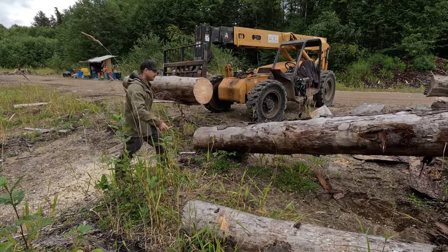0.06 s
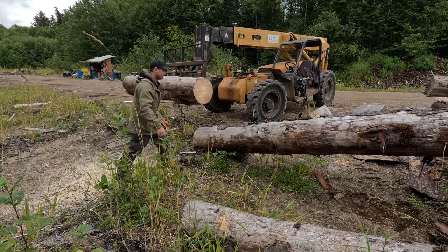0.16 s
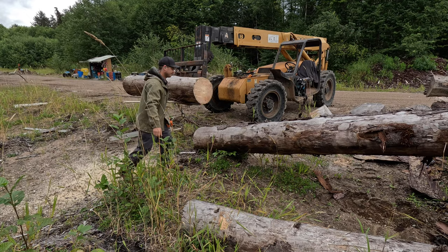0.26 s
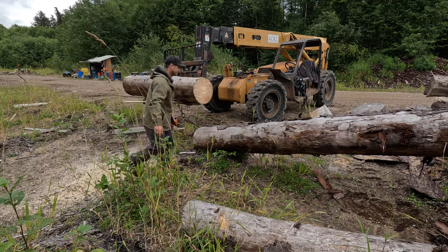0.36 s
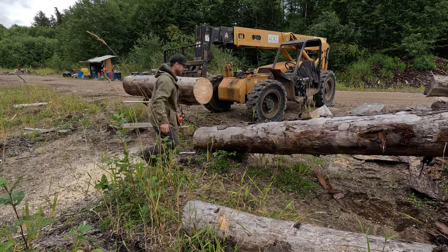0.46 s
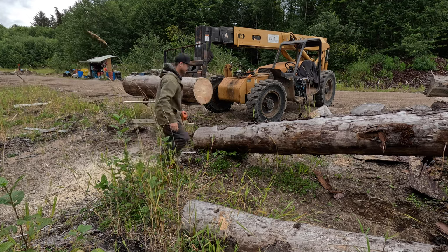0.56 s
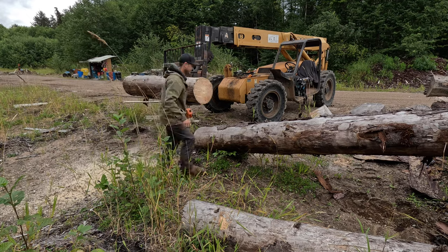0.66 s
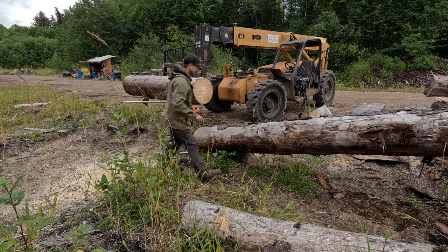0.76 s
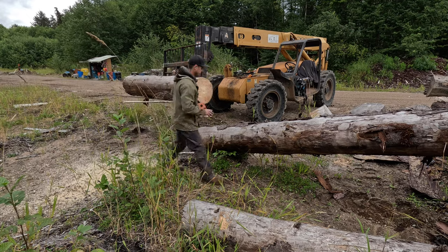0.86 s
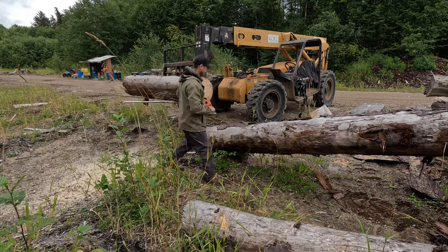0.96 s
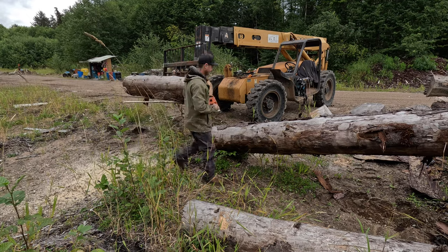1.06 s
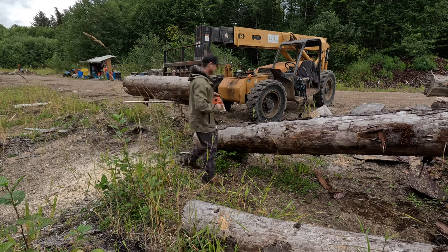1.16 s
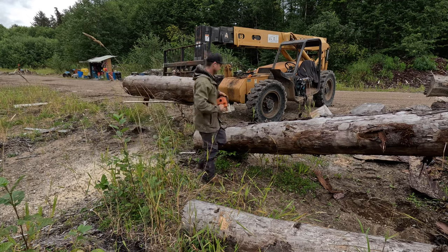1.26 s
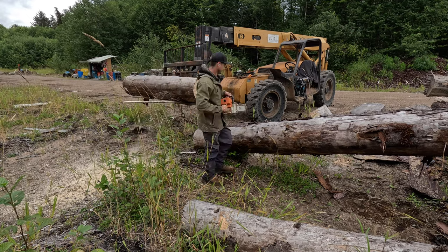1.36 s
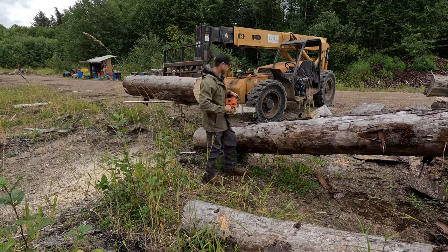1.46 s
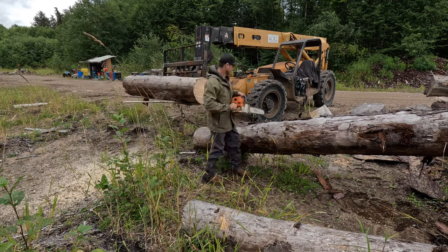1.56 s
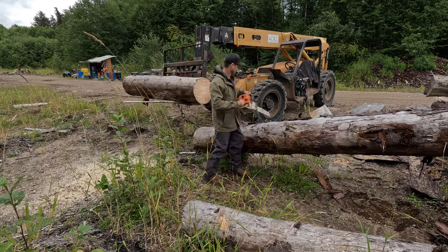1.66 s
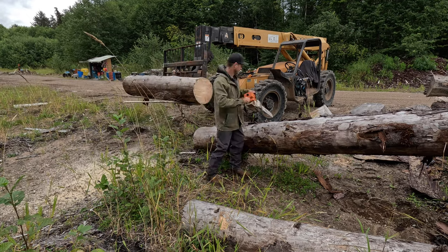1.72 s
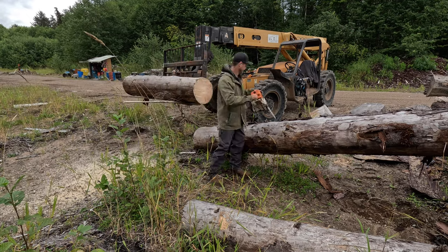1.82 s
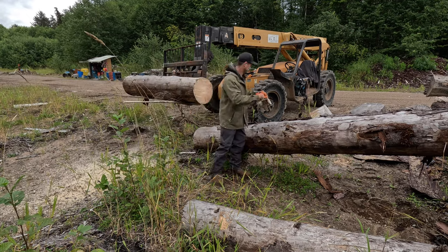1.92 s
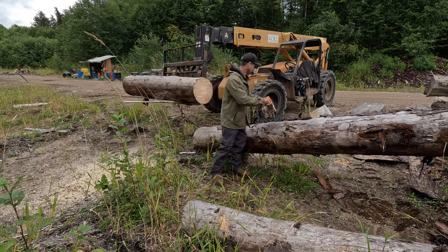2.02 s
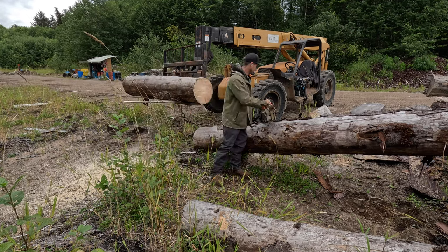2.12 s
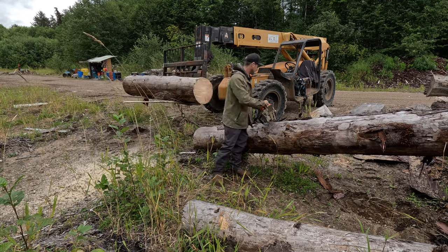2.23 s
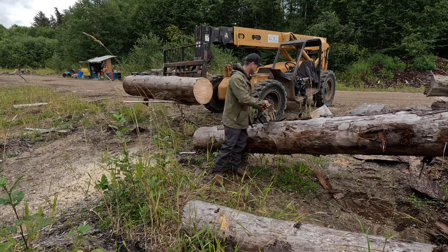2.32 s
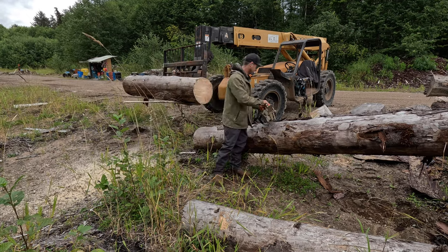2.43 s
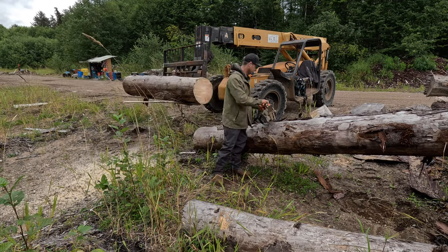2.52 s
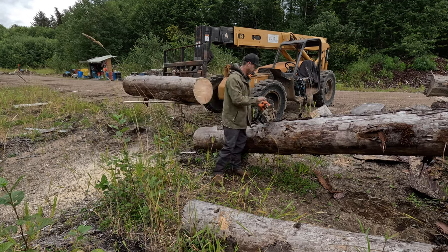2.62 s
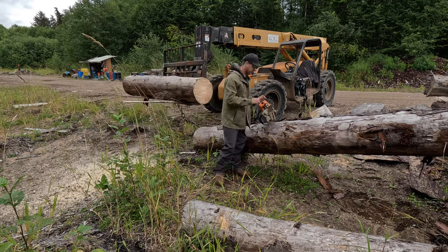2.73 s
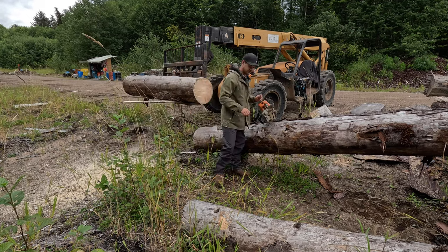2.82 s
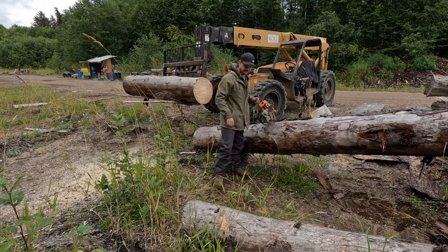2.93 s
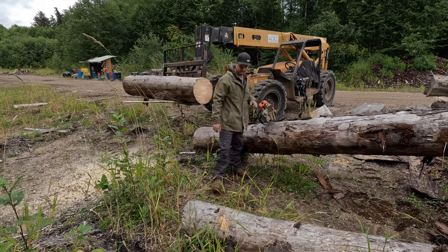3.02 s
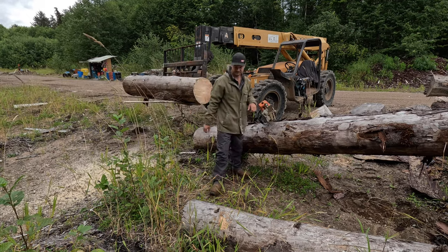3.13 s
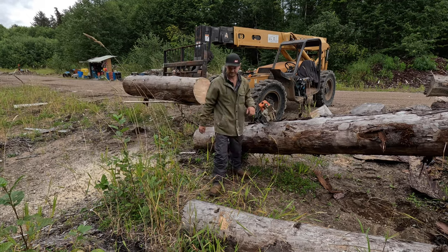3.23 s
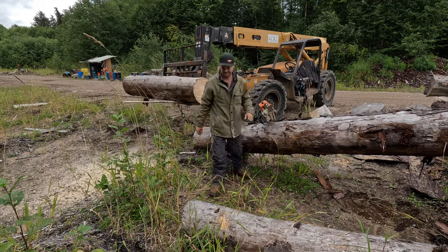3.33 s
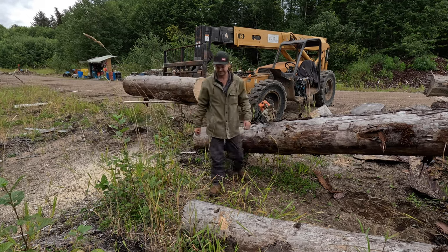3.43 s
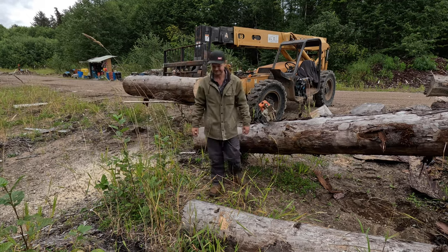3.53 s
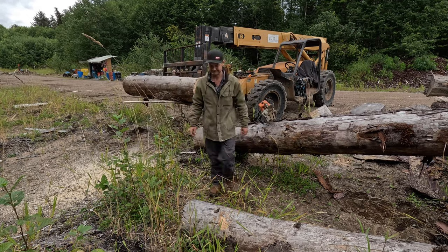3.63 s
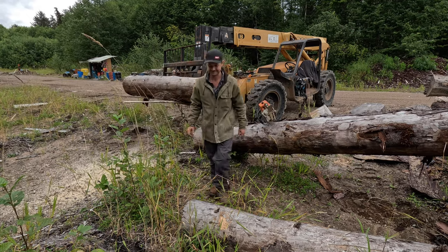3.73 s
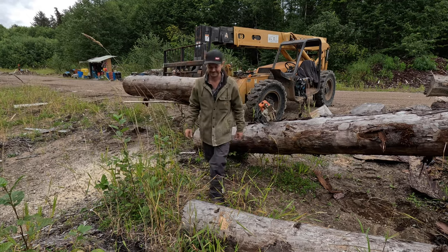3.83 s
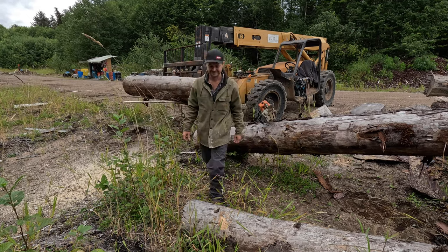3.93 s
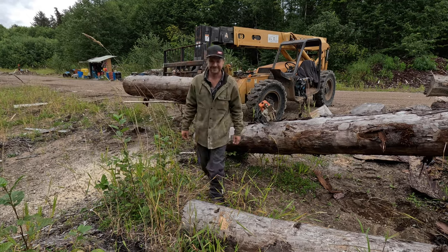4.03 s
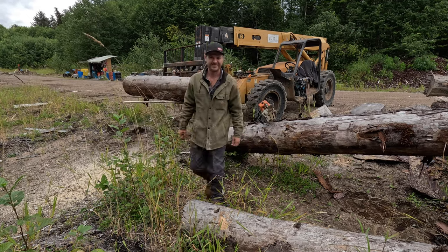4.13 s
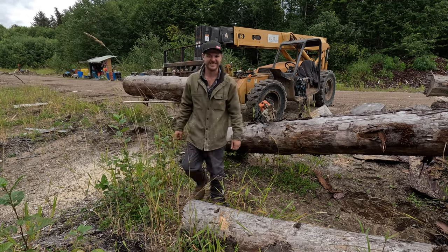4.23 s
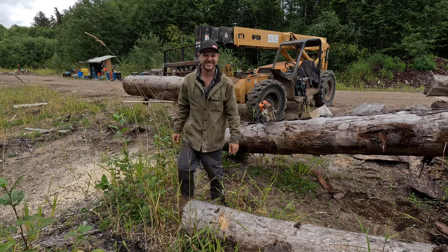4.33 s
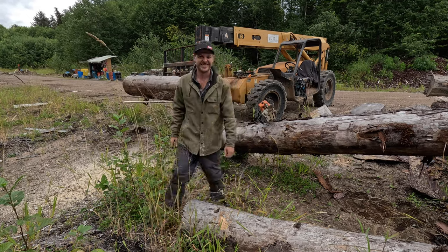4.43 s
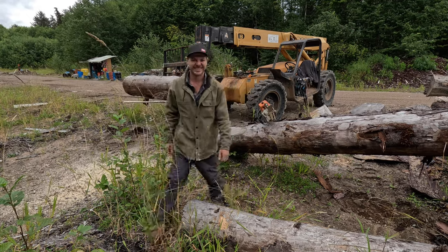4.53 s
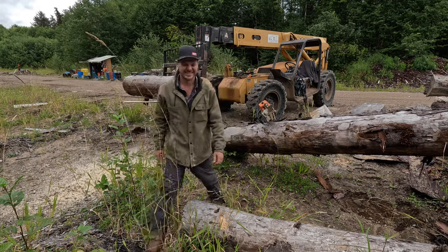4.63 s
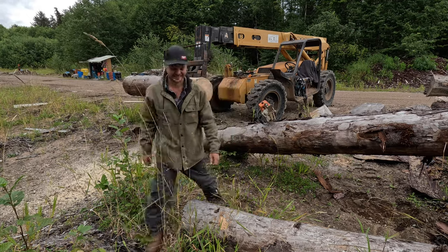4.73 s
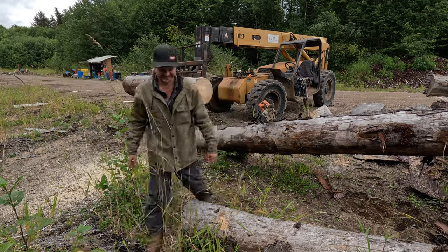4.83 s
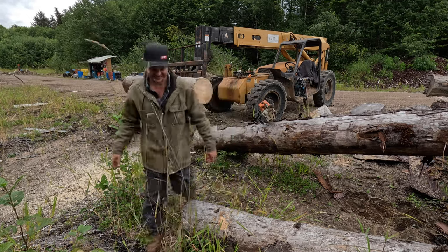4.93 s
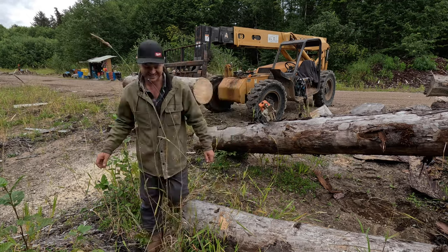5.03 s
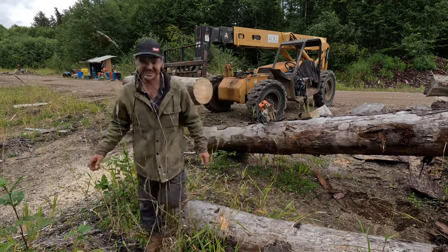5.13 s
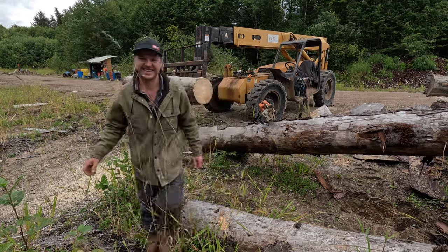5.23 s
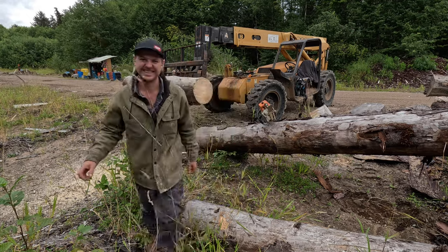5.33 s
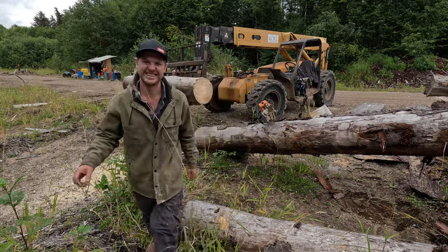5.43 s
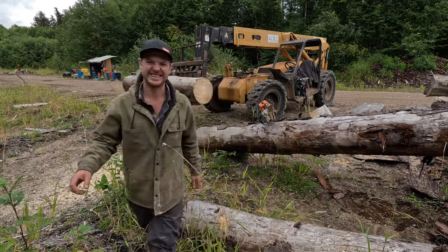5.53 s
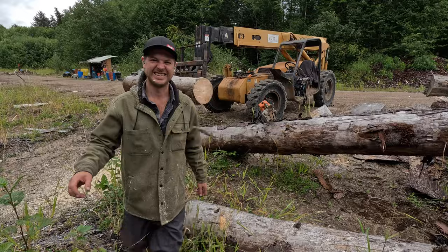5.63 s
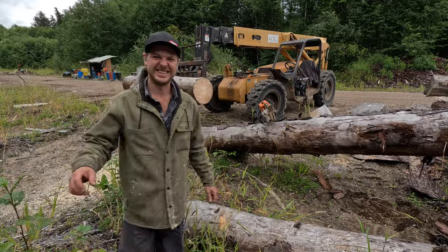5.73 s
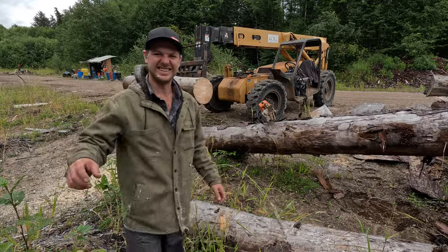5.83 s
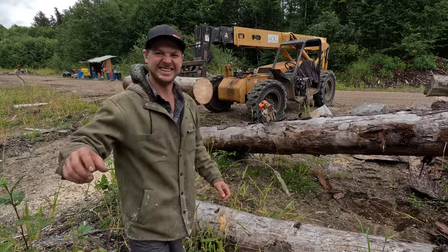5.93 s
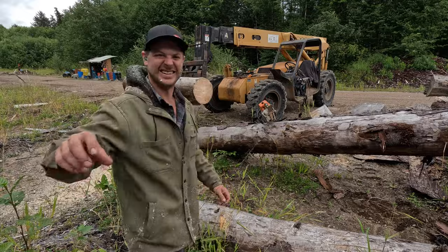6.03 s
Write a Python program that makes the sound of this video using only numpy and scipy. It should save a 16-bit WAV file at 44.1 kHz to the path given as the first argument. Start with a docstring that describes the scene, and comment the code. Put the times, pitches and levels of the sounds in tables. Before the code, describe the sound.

Footsteps swish and crunch through tall weeds, snapping twigs; a chainsaw clatters down onto a log, then the steps come closer.

```python
"""A log yard overgrown with tall weeds. Someone wades through, sets a chainsaw down on a log, stands a
moment and walks on. Leaves swish against the legs, stalks and bark litter crunch in many tiny slips,
twigs snap and boots thud on the earth. The saw rattles as it lands, the trunk rings hollow and a deep
wobble follows as the log rocks. Behind it all lie a faint low rumble and the hiss of distant leaves."""
import sys
import numpy as np
from scipy import signal
from scipy.io import wavfile
from scipy.ndimage import uniform_filter1d

SR = 44100
rng = np.random.default_rng(int(sys.argv[2]) if len(sys.argv) > 2 else 0)


def store_wav(level_fs):
    """Save 16-bit WAV to argv[1]."""
    pcm = np.round(np.clip(np.atleast_2d(level_fs), -1, 1) * 32767)
    wavfile.write(sys.argv[1], SR, pcm.T.astype(np.int16))


N = 267466

# Legs and boots sweeping through the weeds.
# Each row: start in seconds, hold in seconds, crunch level in dB, swish in dB against the crunch.
LEG_SWEEPS = [(0, 0.091, -60.5, -1.5), (0.168, 0.24, -64, 0), (0.452, 0.2, -55.5, -2),
              (0.647, 0.03, -46, -4), (0.744, 0.005, -49, -0.5), (0.86, 0.071, -55, -8.5),
              (1.022, 0.2, -58, -3), (1.374, 0.01, -58, -7), (1.594, 0.024, -56, -6),
              (1.755, 0.061, -49.5, -11), (1.933, 0.09, -67.5, -8), (2.088, 0.006, -64, -17),
              (2.87, 0.02, -73, -4), (3.179, 0.1, -62, -4.5), (3.334, 0.24, -62, -5),
              (3.636, 0.196, -62.5, -2), (3.92, 0.005, -49.5, -7.5), (4.049, 0.16, -62.5, -3),
              (4.236, 0.078, -52, -2), (4.431, 0.035, -44.5, -1), (4.559, 0.065, -46.5, 2.5),
              (4.743, 0.053, -51.5, 3.5), (4.876, 0.26, -60, 1.5), (5.128, 0.057, -50.5, -2.5),
              (5.256, 0.032, -46.5, 2), (5.366, 0.14, -42, 0), (5.554, 0.189, -48.5, -4.5),
              (5.794, 0.052, -47.5, 0.5), (5.906, 0.087, -52, -4)]
def sweep_envelopes():
    """Faders for crunch, swish and press: each sweep swells, holds and dies away to a faint stirring."""
    rise_db_per_s, fall_db_per_s = 305, 105.5
    sole_db = -8.5  # against the crunch
    t = np.arange(0, N + 64, 64) / SR
    start, hold, db, swish_db = np.transpose(LEG_SWEEPS)[..., None]
    before, after = np.maximum(start - t, 0), np.maximum(t - start - hold, 0)
    shape_db = db - rise_db_per_s * before - fall_db_per_s * after
    for offset_db, floor_db in [(0, -75), (swish_db, -82), (sole_db, -80.5)]:
        power = (gain_of(shape_db + offset_db) ** 2).sum(0) + gain_of(floor_db) ** 2
        yield np.interp(np.arange(N) / SR, t, np.sqrt(power))


# Airy leaves, midrange stalks and a dull sole. Each row: frequency in Hz, relative level in dB.
LEAF_EQ = [(1350, -15), (2300, -3.5), (2860, -10.5), (3420, -3), (4510, -5.5), (5440, -1.5), (6240, -4),
           (6660, -3.5), (7580, -4.5), (8220, -9.5), (9830, -9.5), (12100, -18), (14500, -25.5),
           (15200, -37), (16000, -48)]
STALK_EQ = [(260, -39.5), (450, -11), (614, -9), (673, -5.5), (786, -6.5), (853, -3), (1200, 2.5),
            (2190, 0.5), (2800, -8), (4000, -16.5), (5200, -17.5), (8800, -120)]
SOLE_EQ = [(35, -41), (60, -33), (166, 3.5), (204, -1.5), (389, -0.5), (553, -0.5), (742, -8.5), (900, -32),
           (1170, -11), (1980, -120)]
def weed_rustle():
    """Leaves brush the legs, stalks crunch under the boot, the sole presses the litter."""
    crunch, swish, press = sweep_envelopes()
    shake = gain_of(0.5 * wander(0.028))  # one movement shakes all layers together
    ticks = crackle(per_s=90, spread_db=6)  # dry stems cracking, in both leaves and stalks
    brush = unit_rms(grains(per_s=200, spread_db=1.5, tail_s=0.002, clump_db=1, clump_s=0.016, bed=5.4))
    crush = grains(per_s=150, spread_db=4, tail_s=0.0025, clump_db=0.5, clump_s=0.0067, bed=1.37)
    litter = grains(per_s=90, spread_db=2, tail_s=0.013, clump_db=2.5, clump_s=0.02, bed=1.2)
    leaves = colour(brush + 0.2 * ticks, LEAF_EQ)
    stalks = colour(unit_rms(crush) + 0.15 * ticks, STALK_EQ)
    sole = colour(litter, SOLE_EQ)
    return shake * (swish * leaves + crunch * stalks + press * sole)


# Stalks and twigs breaking. Each row: start in seconds, peak in dB, pitch in Hz,
# leaf flick in dB against the peak, 60 dB decay in seconds.
TWIG_BREAKS = [(0.242, -42.5, 1700, -13, 0.029), (0.468, -50, 1670, -16, 0.047),
               (0.495, -39.5, 1150, -8.5, 0.04), (0.644, -38, 1940, -13, 0.13),
               (0.712, -34, 1660, -18, 0.051), (0.738, -37, 1760, -2.5, 0.085),
               (0.857, -35, 690, -20, 0.057), (0.927, -33.5, 1330, -17.5, 0.079),
               (0.931, -39, 815, -39.5, 0.014), (1.106, -34, 1490, -15.5, 0.044),
               (1.139, -47, 704, -9, 0.039), (1.185, -33, 1730, -13, 0.084), (1.225, -50, 1590, -11, 0.018),
               (1.266, -35.5, 1790, -21, 0.085), (1.345, -40.5, 1310, -30, 0.03),
               (1.36, -43.5, 1090, -26, 0.069), (1.375, -48, 1140, -1.5, 0.033),
               (1.418, -37, 1600, -18, 0.028), (1.593, -41.5, 950, -22, 0.21),
               (1.62, -36.5, 930, -41, 0.18), (1.742, -33.5, 1160, -25, 0.015),
               (1.749, -29, 1230, -21, 0.026), (1.757, -31, 610, -22, 0.051),
               (1.967, -47.5, 1600, -9, 0.061), (2.084, -48, 1400, -25, 0.064),
               (2.903, -54, 1550, -11, 0.032), (3.256, -45.5, 1230, -11, 0.1),
               (3.282, -31, 1200, -37, 0.077), (3.338, -41.5, 1280, -29, 0.078),
               (3.362, -29, 1060, -45, 0.026), (3.384, -40, 1130, -34, 0.042),
               (3.405, -30.5, 1210, -42, 0.035), (3.41, -32, 1080, -42, 0.043),
               (3.484, -47.5, 1420, -10, 0.034), (3.658, -40.5, 1670, -19, 0.051),
               (3.694, -51, 2220, -3, 0.022), (3.792, -42.5, 1670, -12, 0.016),
               (3.892, -37.5, 684, -23, 0.091), (3.895, -52, 2220, 4.5, 0.015),
               (3.923, -25, 1670, -27, 0.042), (3.934, -25, 1080, -22, 0.065),
               (3.975, -37.5, 1110, -27, 0.045), (4.062, -47.5, 2000, 1.5, 0.035),
               (4.193, -39.5, 1310, -22, 0.039), (4.211, -42, 1120, -5, 0.018),
               (4.261, -33, 1660, -31, 0.028), (4.32, -32, 1620, -27, 0.03), (4.351, -36.5, 800, -26, 0.1),
               (4.395, -39, 2230, -13, 0.03), (4.426, -30, 2020, -7, 0.043),
               (4.452, -33.5, 1210, -2, 0.066), (4.492, -34.5, 970, -15, 0.019),
               (4.531, -27, 1410, -6, 0.013), (4.602, -33.5, 1220, -22, 0.034),
               (4.772, -35.5, 1350, -2.5, 0.061), (5.046, -36.5, 1300, -25, 0.015),
               (5.071, -37, 1550, -20, 0.03), (5.12, -29, 1780, -10.5, 0.035), (5.16, -45, 1310, -6, 0.051),
               (5.184, -32, 1570, -11.5, 0.02), (5.224, -24, 1840, -1.5, 0.017),
               (5.247, -41, 2050, 10.5, 0.016), (5.259, -26.5, 1850, -9, 0.013),
               (5.346, -28.5, 1260, -24, 0.052), (5.43, -27.5, 2130, -6.5, 0.023),
               (5.458, -34, 1060, 1.5, 0.026), (5.545, -27.5, 1570, -15, 0.02),
               (5.569, -32, 920, -6, 0.034), (5.591, -30, 1130, -24, 0.01),
               (5.686, -36.5, 1120, -18, 0.073), (5.852, -35, 1670, 0.5, 0.039),
               (5.884, -38, 520, -25, 0.033), (5.89, -32, 2070, -25, 0.022), (5.968, -37, 1460, -23, 0.026),
               (6.006, -42, 1000, -8, 0.026)]
def twig_snaps():
    """A break is a click and a weaker run of tearing fibres; it rings the stalk and flicks the leaves."""
    cracks, flick, t = np.zeros(N), np.zeros(N), np.arange(2048) / SR
    click = 12.2 * (t == 0)
    tears = rng.standard_normal((len(TWIG_BREAKS), len(t)))
    for (start, db, hz, flick_db, t60), tear in zip(TWIG_BREAKS, tears):
        fade = decay(t, t60)
        body = band(click + tear * fade, 0.64 * hz, 1.37 * hz)
        add(cracks, start, gain_of(db) * body / abs(body).max())
        add(flick, start, gain_of(db + flick_db) * (decay(t, 0.0069) + 0.42 * fade))
    leaves = colour(rng.standard_normal(N), LEAF_EQ)
    return cracks + 1.03 * band(flick * leaves, 1400, 12000)


# Boots meeting the ground. Each row: start in seconds, level in dB, pitch in Hz,
# 60 dB decay in seconds, level of the low heave in dB.
FOOTFALLS = [(0.494, -43, 216, 0.11, -79), (0.756, -55, 347, 0.088, -58), (0.852, -45, 132.5, 0.22, -47),
             (0.649, -55, 131, 0.087, -64), (1.598, -51.5, 355, 0.13, -61), (1.647, -53.5, 211, 0.1, -59),
             (1.751, -45.5, 358, 0.15, -75), (1.21, -55.5, 132, 0.067, -69), (3.35, -54.5, 133, 0.1, -66),
             (3.602, -46, 375, 0.032, -67), (3.934, -31.5, 357, 0.062, -49), (3.969, -40, 153, 0.092, -62),
             (4.449, -48, 166, 0.13, -57), (4.615, -38.5, 98, 0.12, -62), (4.769, -36, 242, 0.077, -46),
             (5.36, -38.5, 272, 0.11, -54), (5.399, -37, 167, 0.086, -62), (5.514, -39.5, 201, 0.11, -66),
             (5.579, -47, 315, 0.17, -49), (5.637, -41, 345, 0.1, -60), (5.694, -39.5, 104, 0.046, -56),
             (5.81, -41, 239, 0.078, -48), (5.92, -37.5, 290, 0.056, -54)]
def boot_thuds():
    """A soft push with a crumble of earth; the ground rings a few cycles over a deeper heave."""
    out, t = np.zeros(N), np.arange(SR // 4) / SR
    crumbles = rng.standard_normal((len(FOOTFALLS), len(t)))
    for (start, db, hz, t60, heave_db), crumble in zip(FOOTFALLS, crumbles):
        earth = np.sin(2 * np.pi * hz * t) + 0.77 * unit_rms(band(crumble, 0.5 * hz, 2.26 * hz))
        thud = attack(t, 0.0042) * decay(t, t60) * earth
        heave = attack(t, 0.0078) * decay(t, 0.16) * np.sin(2 * np.pi * 68 * t)
        add(out, start, gain_of(db) * thud + gain_of(heave_db) * heave)
    return out


# The saw lands and rocks on the bark.
# Each row: start in seconds, level in dB, brightness in dB, 60 dB decay in seconds.
SAW_KNOCKS = [(2.186, -17.5, -10, 0.17), (2.196, -19.5, -4.5, 0.16), (2.217, -40, 5, 0.069),
              (2.245, -29, -19, 0.071), (2.265, -40, 2, 0.15), (2.291, -37, 7.5, 0.15),
              (2.311, -23.5, -3, 0.041), (2.325, -42, 15, 0.077), (2.35, -44.5, 18, 0.06),
              (2.364, -58, 6.5, 0.41)]
# Modes of bar and casing. Each row: frequency in Hz, width in Hz before extra damping, level in dB.
SAW_MODES = [(915, 120, -8), (1195, 48, -3.5), (1670, 42, 3.5), (1880, 19, 4), (2334, 41, 10.5),
             (2440, 21, -17), (4140, 72, 4), (4720, 76, 2.5), (5040, 220, 1.5), (6600, 160, -20),
             (7500, 200, -27), (9100, 65, 0)]
def saw_clatter():
    """Each knock rattles loose parts, heard dull through the bark and ringing in the bar and casing."""
    dull, bright, t = np.zeros(N), np.zeros(N), np.arange(SR // 4) / SR
    damping_hz = 8.6
    for start, db, bright_db, t60 in SAW_KNOCKS:
        knock = gain_of(db) * attack(t, 0.0036) * decay(t, t60)
        add(dull, start, knock)
        add(bright, start, knock * gain_of(bright_db))
    rattle = grains(per_s=690, spread_db=8.5, tail_s=0.0039, clump_db=-0.6, clump_s=0.0027, bed=1)
    low, high = dull * unit_rms(rattle), bright * unit_rms(rattle)
    rings = sum(gain_of(db) * resonate(low if hz < 2700 else high, hz, width + damping_hz)
                for hz, width, db in SAW_MODES)
    return 1.07 * band(low, 202, 2450) + 0.82 * band(high, 2780, 7170) + 0.85 * band(rings, 400, 10700)


# The saw's weight hitting the log. Each row: start in seconds, level in dB,
# 60 dB decay of the main ring in seconds, hardness (level of the other modes) in dB.
TRUNK_BLOWS = [(2.189, -32, 0.28, -2), (2.23, -39.5, 0.2, 3.5), (2.296, -34, 0.2, -11),
               (2.42, -49, 0.2, -7)]
# Modes woken by hard blows. Each row: frequency in Hz, relative level in dB, 60 dB decay in seconds.
TRUNK_MODES = [(64.3, 6.5, 0.1), (226, 1.5, 0.066), (318, -1, 0.075)]
def trunk_ring():
    """The hollow ring of the trunk under the saw; its main note sags as it dies."""
    out, t = np.zeros(N), np.arange(SR // 2) / SR
    main_hz = 140
    modes = sum(gain_of(db) * decay(t, t60) * np.sin(2 * np.pi * hz * t) for hz, db, t60 in TRUNK_MODES)
    for start, db, t60, hard_db in TRUNK_BLOWS:
        main = decay(t, t60) * np.sin(2 * np.pi * main_hz * t * (1 - 0.5 * t))
        add(out, start, gain_of(db) * attack(t, 0.012) * (main + gain_of(hard_db) * modes))
    return out


# The rise and fall of the sub-bass. Each row: time in seconds, level in dB.
LOW_SWELLS = [(0, -84), (.8, -73), (1.7, -93), (2.1, -79), (2.3, -46), (2.4, -50), (2.53, -77), (2.65, -51),
              (2.78, -58), (2.86, -64), (3.05, -64), (3.3, -69), (3.8, -94), (4.6, -78), (4.79, -64),
              (5.05, -88), (5.65, -76), (6.06, -71)]
def low_rumble():
    """A deep wobble after the saw lands, as the log rocks, with a faint low rumble elsewhere."""
    times, db = np.transpose(LOW_SWELLS)
    lumps = band(rng.standard_normal(N), 6, 20, order=4)
    return gain_of(np.interp(np.arange(N) / SR, times, db)) * unit_rms(lumps)


# The steady hiss of the yard. Each row: frequency in Hz, relative level in dB.
YARD_EQ = [(59, -43), (100, -15.5), (219, 0.5), (933, -17), (1300, -1), (2270, -7.5), (2790, -15),
           (4490, -9.5), (5870, -5), (7530, -11.5), (14000, -44)]
def yard_hiss():
    """Distant leaves in the breeze blend into a smooth bed."""
    return gain_of(-73) * colour(rng.standard_normal(N), YARD_EQ)


def grains(per_s, spread_db, tail_s, clump_db, clump_s, bed):
    """Many small slips of uneven size that start sharply and trail off, in clumps, over a noise bed."""
    trails = signal.lfilter([1], [1, -np.exp(-1 / (tail_s * SR))], impulses(per_s, spread_db))
    return (unit_rms(trails) + bed) * rng.standard_normal(N) * gain_of(clump_db * wander(clump_s))


def crackle(per_s, spread_db):
    """Sparse single clicks of either sign."""
    return unit_rms(impulses(per_s, spread_db) * rng.choice([-1, 1], N))


def impulses(per_s, spread_db):
    """Randomly timed spikes, most small and a few large."""
    size = gain_of(spread_db * np.minimum(rng.exponential(1, N), 4))
    return size * (rng.random(N) < per_s / SR)


def wander(seconds):
    """A random drift of rms 1 that changes over the given time."""
    span = round(seconds * SR)
    return unit_rms(uniform_filter1d(uniform_filter1d(rng.standard_normal(N), span), span))


def colour(x, eq):
    """Minimum-phase EQ, so a click rings after it and not before; the result has rms 1."""
    hz = abs(np.fft.fftfreq(4096, 1 / SR))
    log_gain = np.log(gain_of(np.maximum(curve_at(eq, hz), -100)))
    taps = np.fft.ifft(np.exp(np.conj(signal.hilbert(log_gain)))).real[:2048]
    return unit_rms(signal.oaconvolve(x, taps)[:len(x)])


def resonate(x, hz, width_hz):
    return signal.lfilter(*signal.iirpeak(hz, hz / width_hz, SR), x)


def band(x, low_hz, high_hz, order=3):
    return signal.sosfilt(signal.butter(order, [low_hz, high_hz], "band", fs=SR, output="sos"), x)


def curve_at(points, hz):
    point_hz, values = np.transpose(points)
    return np.interp(np.log(hz + 1), np.log(point_hz + 1), values)


def attack(t, rise_s):
    return 1 - np.exp(-t / rise_s)


def decay(t, t60):
    return gain_of(-60 * t / t60)


def gain_of(db):
    return 10 ** (np.asarray(db) / 20)


def unit_rms(x):
    return x / np.sqrt(np.mean(x ** 2) + 1e-20)


def add(mix, start_s, sound):
    part = mix[round(start_s * SR):][:len(sound)]
    part += sound[:len(part)]


# Balance between the microphone ports. Each row: frequency in Hz, left minus right in dB.
STEREO_BALANCE = [(60, -0.5), (99, -0.5), (160, -3), (270, -2.5), (450, -2.0), (740, -3), (1220, -2.0),
                  (2010, -2.5), (3330, -6.5), (5500, -2), (9080, 1), (15000, -2)]
# Phase between the ports. Each row: frequency in Hz, lead of the left in radians.
STEREO_PHASE = [(30, 0), (500, -.06), (1100, -.2), (2500, -1.2), (3300, -.4), (4200, -1.2), (4750, .3),
                (5900, 0), (12000, .1), (15000, -.5)]
# How alike the two sides sound. Each row: frequency in Hz, likeness from 0 to 1.
STEREO_LIKENESS = [(30, 0.98), (60, 0.93), (250, 0.96), (700, 0.86), (1500, 1), (3000, 0.83), (4500, 0.7),
                   (7000, 1), (11000, 0.86), (14000, 0.3)]
def scene():
    """The sources lie in many directions, so part of the mix reaches the right port with other phases."""
    walk = weed_rustle() + twig_snaps() + boot_thuds()
    mono = walk + saw_clatter() + trunk_ring() + low_rumble() + yard_hiss()
    hz, _, spectrum = signal.stft(mono, SR, nperseg=256)
    hz = hz[:, None]
    likeness = curve_at(STEREO_LIKENESS, hz)
    scattered = np.exp(2j * np.pi * rng.random(spectrum.shape[::-1]).T)
    tilt = gain_of(curve_at(STEREO_BALANCE, hz) / 2) * np.exp(0.5j * curve_at(STEREO_PHASE, hz))
    left = spectrum * tilt
    right = spectrum * (likeness + np.sqrt(1 - likeness ** 2) * scattered) / tilt
    return signal.istft(np.array([left, right]), SR, nperseg=256)[1][:, :N]


def record(dry):
    """The microphone housing leaves a narrow dip in the treble; a steep low-pass trims the top."""
    dipped = dry - 0.5 * resonate(dry, hz=4420, width_hz=290)
    low_pass = signal.firwin(511, 15700, window=("kaiser", 9), fs=SR)
    return signal.oaconvolve(dipped, low_pass[None], "same")


dry = scene()
out = record(dry)
store_wav(out)
```